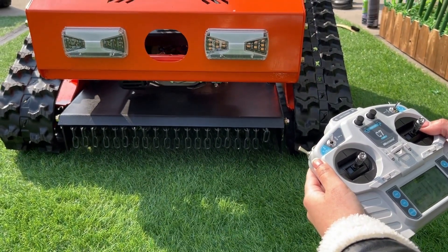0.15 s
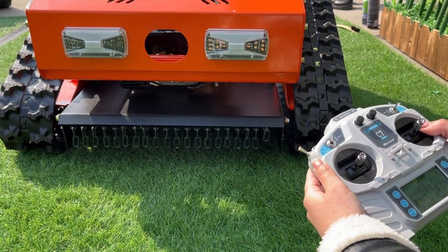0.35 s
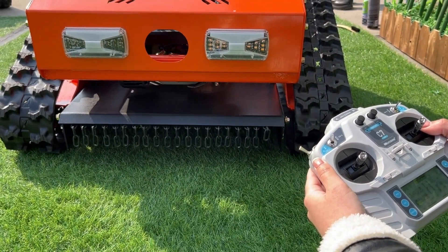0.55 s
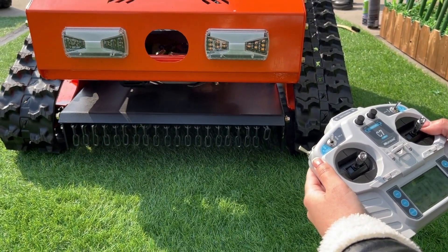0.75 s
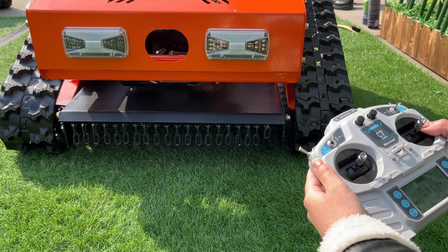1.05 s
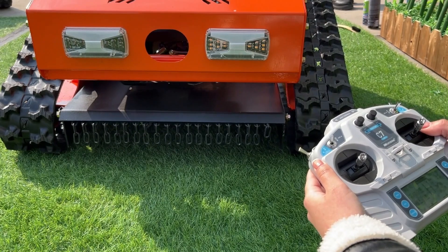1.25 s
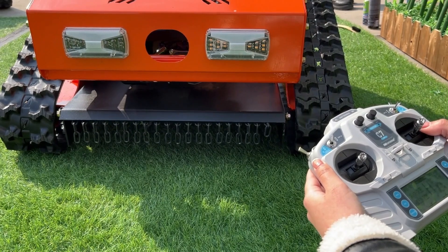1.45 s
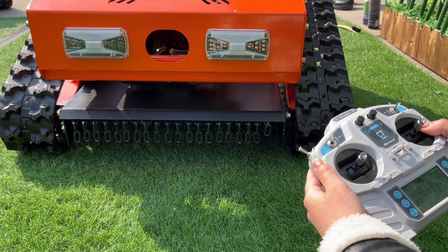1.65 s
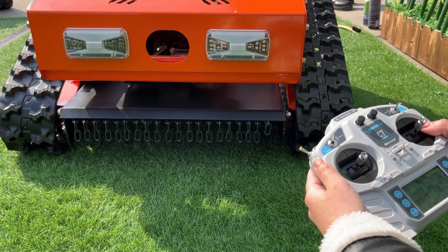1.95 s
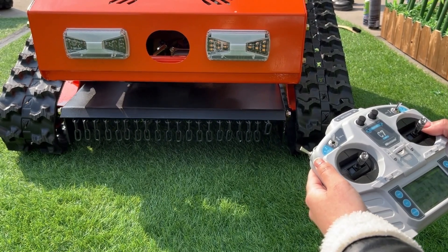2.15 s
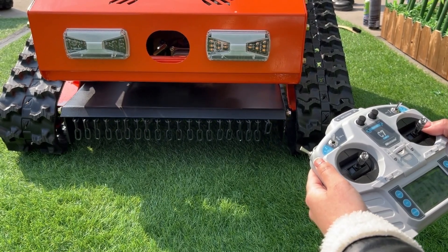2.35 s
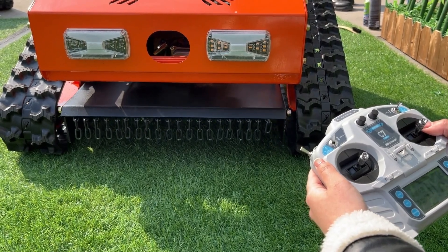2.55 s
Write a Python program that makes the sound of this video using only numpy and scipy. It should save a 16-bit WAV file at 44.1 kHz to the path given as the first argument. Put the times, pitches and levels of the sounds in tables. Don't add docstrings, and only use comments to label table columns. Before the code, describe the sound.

Small electric actuator motors whine continuously from 0 to about 2.6 seconds, already running at the start and never stopping. The main tone sits near 1600 hertz, with a close second tone beating against it and a weaker lower hum near 800. Pitch sags slightly by 1 second; brief dips come near 1.0, 1.7 and 2.4. Metallic gear noise, high hiss and faint distant traffic rumble continue underneath, outdoors.

```python
import sys
import numpy as np
from scipy import signal
from scipy.fft import rfft, irfft, next_fast_len
from scipy.io import wavfile
from scipy.ndimage import map_coordinates

SR = 44100
rng = np.random.default_rng(int(sys.argv[2]) if len(sys.argv) > 2 else 0)


def dump_mix(stems):
    frames = np.atleast_2d(stems).T
    limited = np.clip(frames, -1, 1)
    pcm = np.round(limited * 32767).astype(np.int16)
    wavfile.write(sys.argv[1], SR, pcm)


def how_loud(loudness_db):
    steps = np.asarray(loudness_db, float) / 20
    return 10 ** steps


N = 119070
T = np.arange(N) / SR


def unit(x):
    return x / np.sqrt(np.mean(x ** 2) + 1e-20)


def along(points, hz):
    f, *columns = np.transpose(points)
    return [np.interp(np.log(hz + 1), np.log(f + 1), column) for column in columns]


def curves(rows):
    s, *columns = np.transpose(rows)
    return [np.interp(T, s, column) for column in columns]


def wobble(rate):
    knots = rng.standard_normal(int(N * rate / SR) + 4)
    return map_coordinates(knots, [np.arange(N) * rate / SR])


def once_a_turn(shaft_hz, depth):
    return 1 + depth * np.sin(2 * np.pi * np.cumsum(shaft_hz) / SR)


def rush(gain, ports, swell):
    m = next_fast_len(N + 8192)
    hz = np.fft.rfftfreq(m, 1 / SR)
    a, b = rfft(rng.standard_normal((2, N)) * swell, m) * gain(hz)
    alike, pan_db, lead = ports(hz)
    angle = np.arccos(np.clip(alike, 0, 1)) / 2
    common, apart = np.cos(angle) * a, np.sin(angle) * b
    half = how_loud(pan_db / 2) * np.exp(-.5j * lead)
    return unit(irfft([(common + apart) * half, (common - apart) / half], m)[:, :N])


# f/Hz, level/dB
RUMBLE = [(20, -35), (35, -10), (62, 3), (100, -5.5), (135, -4), (300, -17), (1600, -100)]


def traffic():
    swell_db = 2.5 * np.cos(2 * np.pi * (T - .35) / 2.7)

    def ports(f):
        return along([(40, 1.0), (200, .9)], f)[0], .9, 0

    level_db = -46.5
    return how_loud(level_db) * rush(lambda f: how_loud(along(RUMBLE, f)[0]), ports, how_loud(swell_db + 0.89 * wobble(7)))


# f/Hz, level/dB
HISS = [(1800, -79), (4300, -2.5), (6200, -5.5), (7300, 0.5), (8300, 1.5), (9200, 1), (10600, -5),
        (15500, -7.5)]
# f/Hz, likeness/0-1, right port's lead/rad
HISS_ALIKE = [(4000, .2, -.6), (6200, .45, 1.2), (7450, .92, 2.4), (8200, .999, 3.1), (8750, .999, 3.3),
              (11800, .99, 6.28), (14400, .99, 8.65), (15150, .999, 9.42)]


def brushes(shaft_hz):
    flicker_db = 0.25 * wobble(4) + 0.37 * wobble(14) + 0.49 * wobble(180)

    def ports(f):
        alike, lead = along(HISS_ALIKE, f)
        return alike, 0, lead

    swell = once_a_turn(shaft_hz, .04) * how_loud(flicker_db)
    level_db = -43.5
    return how_loud(level_db) * rush(lambda f: how_loud(along(HISS, f)[0]), ports, swell)


# f/Hz, width/Hz, level/dB
CASING = [(198.5, 17.3, -4), (402.7, 27, -11), (490.3, 12.5, 0), (562.4, 39, -3), (655, 49, -15.5),
          (1813, 30, -2), (1100, 130, -9.5), (1585, 233, 0), (1700, 110, -11), (2112, 40, -7.5),
          (2345, 77, -3), (3230, 190, -11.5), (3810, 350, -15), (4713, 70, -14)]
# f/Hz, level/dB
CASING_BED = [(150, -40), (300, -15.5), (800, -9), (1330, -17.5), (2000, -10.5), (2900, -13), (4300, -26),
              (6500, -30)]
# f/Hz, likeness/0-1, left over right/dB, right port's lead/rad
PORTS = [(150, .95, 1.5, 0), (1050, .85, 3, -.2), (1350, .5, 0, -2), (1590, .85, 0, -3.4),
         (1730, .995, 0, -6.28), (1950, .99, .5, -6.3), (3200, .72, 5, -7.3), (4700, .45, 5, -6.3)]


def casing(shaft_hz):
    def ring(f):
        power = how_loud(along(CASING_BED, f)[0]) ** 2
        for center, width, db in CASING:
            power = power + how_loud(db) ** 2 / (1 + (2 * (f - center) / width) ** 2) ** 2
        return np.sqrt(power) * (f < 7400)

    swell = once_a_turn(shaft_hz, 0.077) * how_loud(0.2 * wobble(1.37))
    level_db = -37
    return how_loud(level_db) * rush(ring, lambda f: along(PORTS, f), swell)


def motor(orders, shaft_hz, even_swell_db, odd_drift, odd_late_db, most_share, lean_order, lean_db):
    bars = 14
    turns = 2 * np.pi * np.cumsum(shaft_hz) / SR
    middle_s = T - T.mean()
    late_db = odd_late_db * np.exp(-(T / 0.23) ** 4)
    swing = np.exp(-(T / 1) ** 2)
    out = np.zeros((2, N))
    for order, db, pan_db, lead in orders:
        if order % bars:
            level_db = db + 3.5 * wobble(7.24)
        else:
            share = min(np.log(order / 10.5), most_share)
            if order // bars % 2:
                follow_db = share * odd_drift * middle_s - late_db
            else:
                follow_db = share * even_swell_db
                if order == 4 * bars:
                    follow_db = follow_db + 3 * middle_s
            level_db = db + follow_db + 1.22 * wobble(9.26)
        if order == lean_order:
            pan_db = pan_db + lean_db * (swing - swing.mean())
        half_db = pan_db / 2
        jitter = .05 * order / bars * wobble(25)
        phase = order * turns + rng.uniform(0, 2 * np.pi) + jitter
        loudness = how_loud([level_db + half_db, level_db - half_db])
        out += np.sqrt(2) * loudness * np.sin([phase - lead / 2, phase + lead / 2])
    return out


# t/s, first motor level/dB, second motor level/dB
EVEN_SWELL = [(0, -8, -2), (.2, -5, 1), (.29, 3, 1), (.45, 3, 0), (.6, 2, -1), (.88, 2.5, -2), (1, -9, -1),
              (1.11, -1.5, 3), (1.25, 2, 0), (1.6, 0, 0), (1.72, -10, 3), (1.82, 0.5, 2), (2.1, 2.5, -2),
              (2.27, -1, -3), (2.4, -11, -1), (2.5, -10, 2), (2.6, -10, 0), (2.7, -9, -2)]
# shaft order, level/dB, left over right/dB, right port's lead/rad
FIRST = [(12, -56, 0, -.1), (13, -54, 2, -.2), (14, -45.5, 4, .2), (26, -57, 1, -2.8), (27, -48, 0, 2.4),
         (28, -35, -2, 1.9), (29, -48, 2, 3), (30, -53, 1, -.6), (31, -52, 0, -.1), (41, -55, 3, -.7),
         (56, -51.5, 10, -1.1), (57, -58, 6, -1.2), (69, -61, 8, 0), (71, -63, 5, -.6)]
SECOND = [(12, -55, 0, .2), (14, -51, 8, -.7), (18, -61, 5, -.1), (27, -52, -2, 3), (28, -41, 1, 2.8),
          (29, -50, 4, -.7), (42, -45.5, 2, -.6), (43, -58, 4, -.5), (56, -59, 3, -1.1), (70, -60, 3, -.2),
          (84, -69, 7, 0), (98, -69, 2, 1.8), (126, -66, 2, 2.1), (140, -66, 0, 3.1)]


def both_motors(first_hz, second_hz):
    first_db, second_db = curves(EVEN_SWELL)
    first = motor(FIRST, first_hz, first_db, odd_drift=-12, odd_late_db=4, most_share=1,
                  lean_order=14, lean_db=-10)
    second = motor(SECOND, second_hz, second_db, odd_drift=1.6, odd_late_db=12, most_share=2,
                   lean_order=28, lean_db=15)
    return first + second


# t/s, first motor f/Hz, second motor f/Hz
SPEED = [(0, 57.08, 58.16), (.2, 56.96, 58.05), (.36, 56.65, 57.62), (.6, 56.75, 57.9), (.82, 56.51, 57.73),
         (.98, 56.04, 57.55), (1.1, 56.13, 57.15), (1.27, 56.33, 57.57), (1.42, 56.31, 57.45),
         (1.57, 56.24, 57.59), (1.72, 56.06, 57.11), (1.85, 56.36, 57.2), (2.08, 56.6, 57.73),
         (2.25, 56.42, 57.51), (2.4, 56.08, 57.35), (2.5, 56.06, 57.16), (2.6, 56.03, 57.35),
         (2.7, 56.2, 57.65)]


def scene():
    first_hz, second_hz = curves(SPEED)
    return traffic() + brushes(first_hz) + casing(first_hz) + both_motors(first_hz, second_hz)


def low_pass(x):
    return signal.sosfilt(signal.butter(12, 15730, fs=SR, output="sos"), x)


def record(dry):
    m = next_fast_len(N + 8192)
    passed = np.fft.rfftfreq(m, 1 / SR) < 15730
    mix = irfft(rfft(dry, m) * passed, m)[:, :N]
    return low_pass(mix)


dry = scene()
out = record(dry)
dump_mix(out)
```